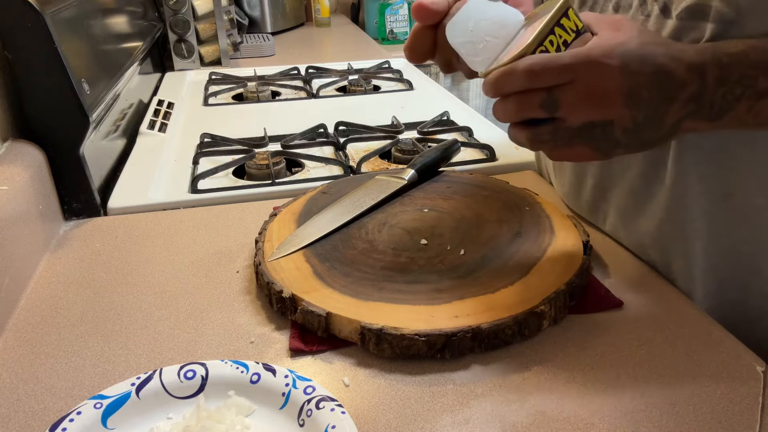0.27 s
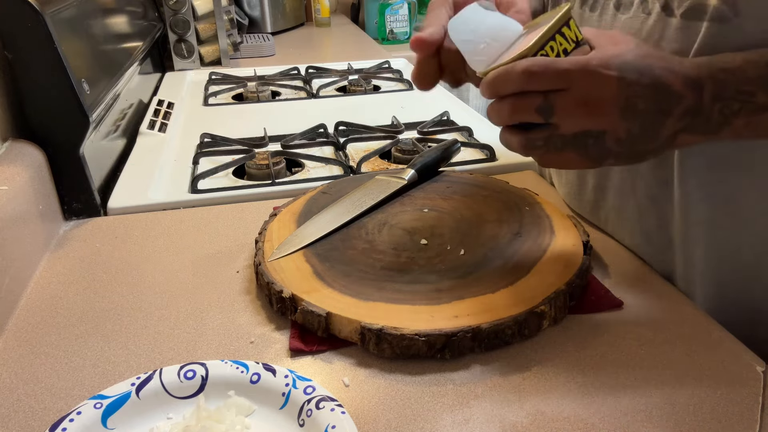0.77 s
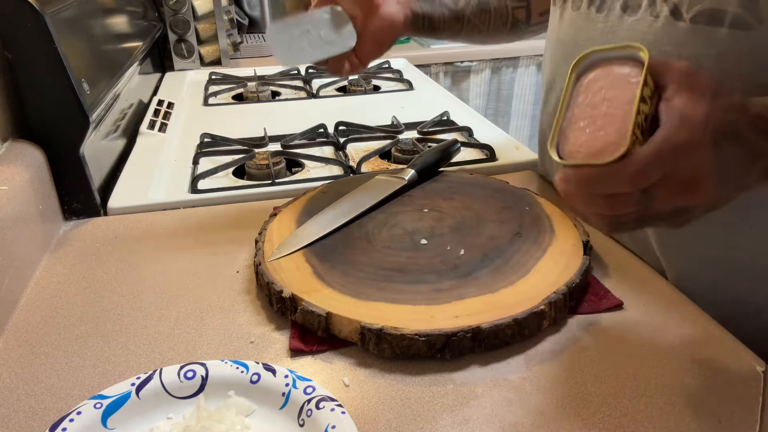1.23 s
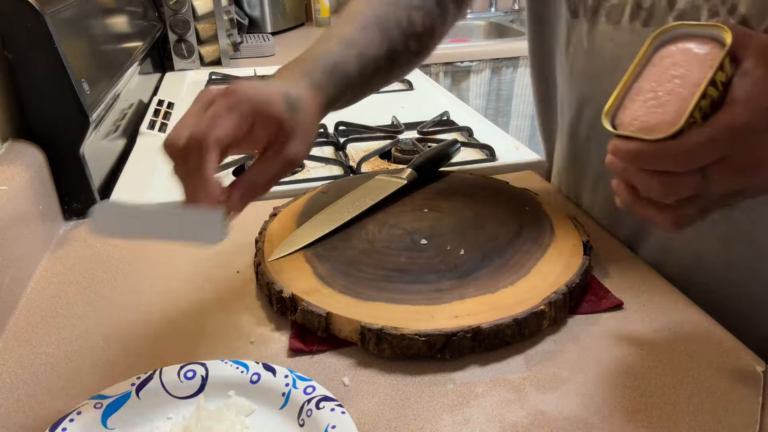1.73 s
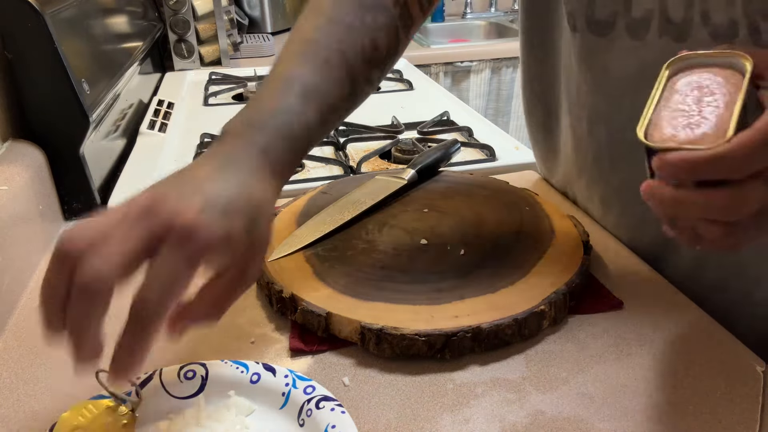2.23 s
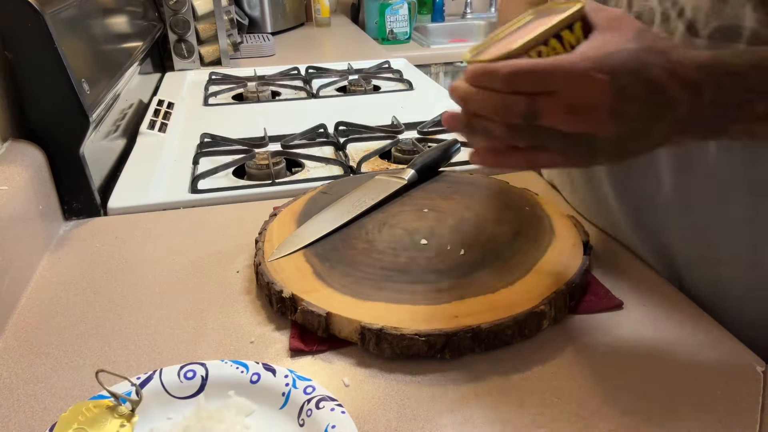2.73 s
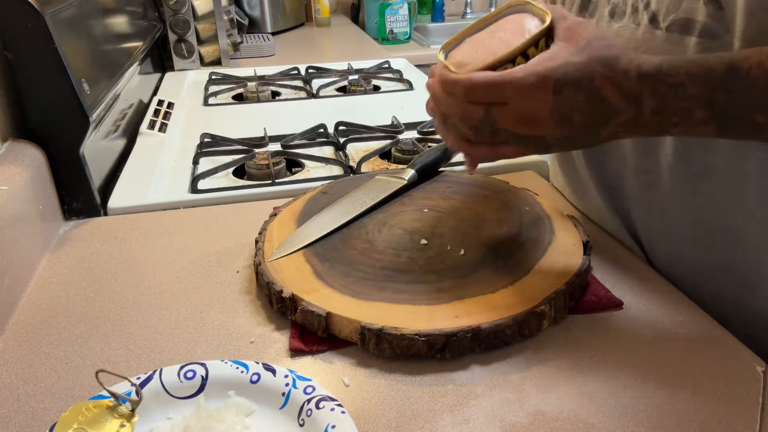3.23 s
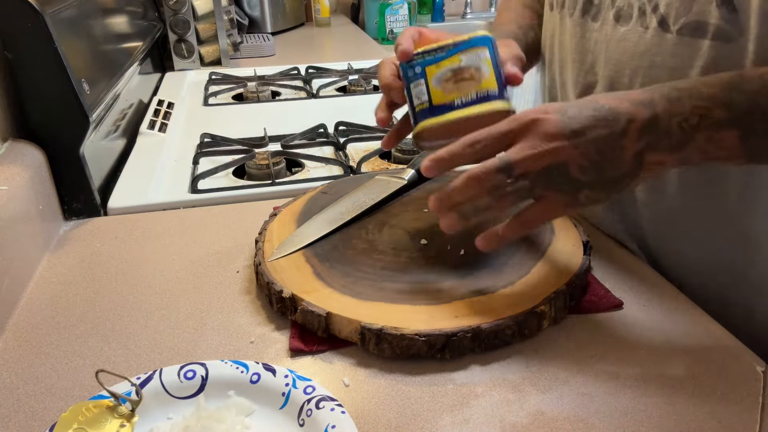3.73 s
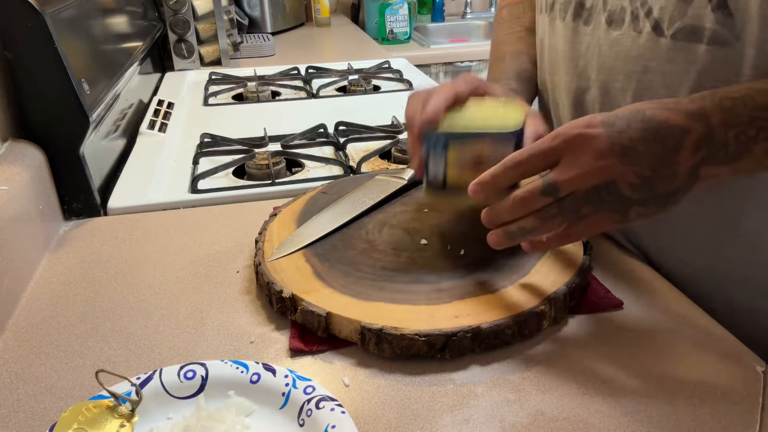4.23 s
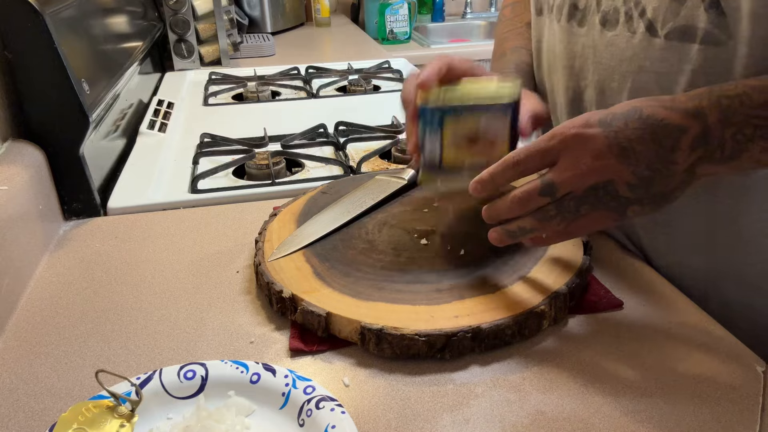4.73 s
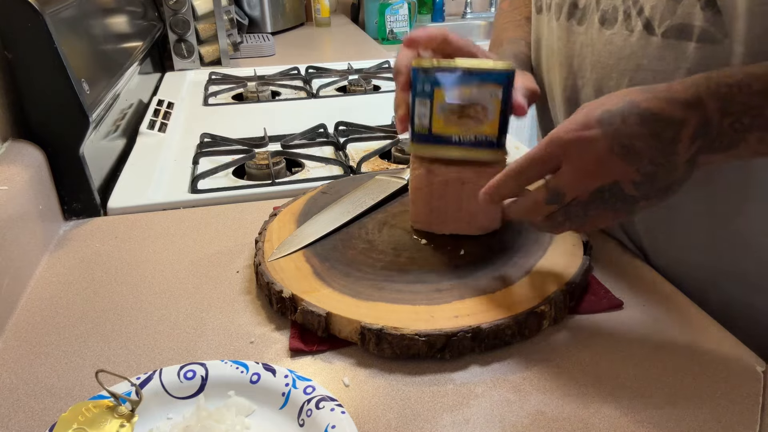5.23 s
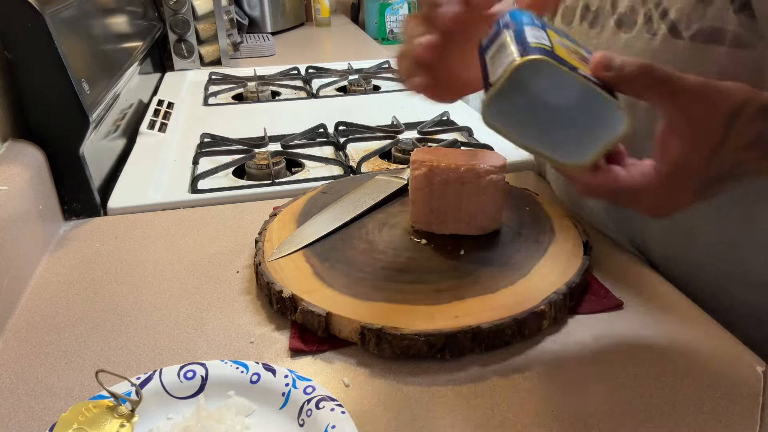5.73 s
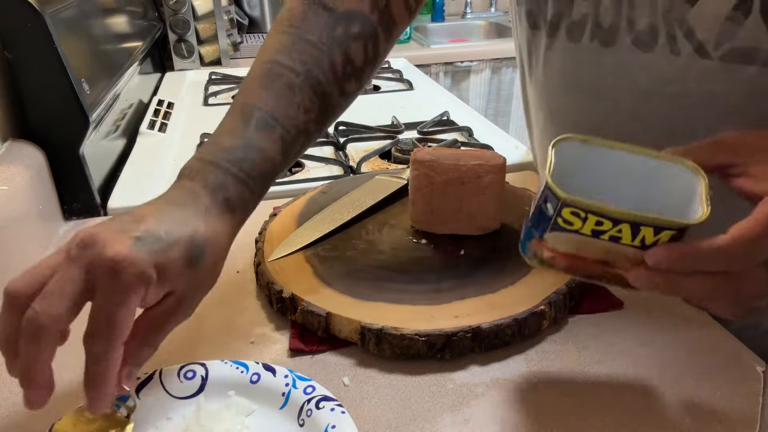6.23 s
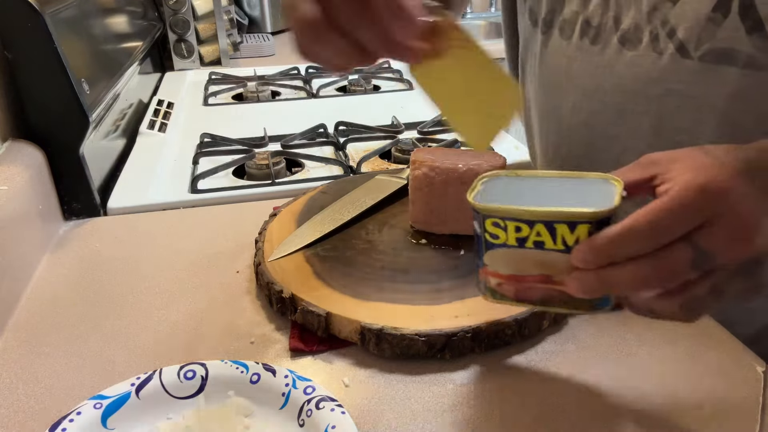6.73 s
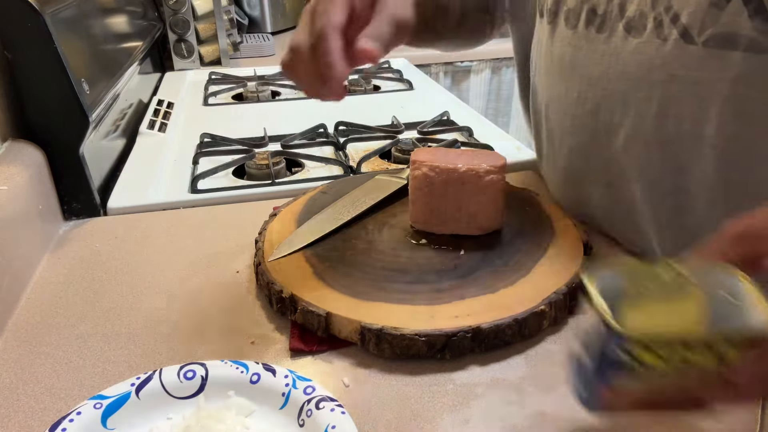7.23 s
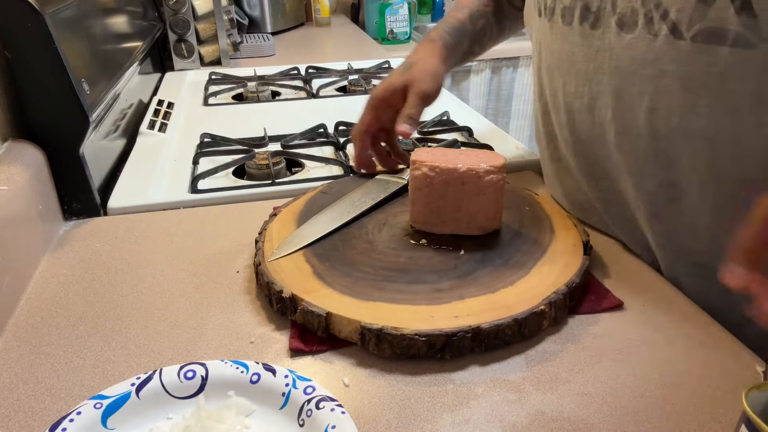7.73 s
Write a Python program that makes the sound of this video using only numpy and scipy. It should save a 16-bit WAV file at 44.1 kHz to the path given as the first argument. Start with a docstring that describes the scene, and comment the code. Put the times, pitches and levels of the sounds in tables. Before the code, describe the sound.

A microwave hums while a can lid snaps off, wet meat thuds onto a wooden board, and the empty can clinks.

```python
"""Emptying a can beside the microwave.

Home kitchen, close to a two-port microphone; a microwave oven's transformer hums and its fan blows.
A tin lid is torn off in snaps and laid down. The can is squeezed until its wall pops, and shaken
until the wet block sucks free and thuds on a wooden board. The lid is dropped into the empty can
and the can is set aside. Each blow is a crack of noise plus ringing modes, answered by the room."""
import sys
import numpy as np
from scipy import signal
from scipy.fft import rfft, irfft
from scipy.io import wavfile

SR = 44100
rng = np.random.default_rng(int(sys.argv[2]) if len(sys.argv) > 2 else 0)


def int16_out(signal):
    """Quantize to a 16-bit WAV file."""
    q = np.round(np.clip(np.atleast_2d(signal).T, -1, 1) * 32767)
    wavfile.write(sys.argv[1], SR, q.astype(np.int16))


N = 352610

# modes of the wet gap between block and can: f/Hz, level/dB, t60/s
WET_GAP_MODES = [(690, 3, 0.03), (866, -4.5, 0.028), (1240, 2.5, 0.054), (1560, 2.5, 0.031),
                 (2100, 2.5, 0.02), (2960, -6, 0.021), (4700, -6.5, 0.0067)]


def tin_lid():
    """The lid tears off in a run of snaps, then taps and rings lower as it is laid down."""
    # blows: t/s, level/dB, crack f/Hz, ring level/dB
    snaps = [(.0648, -20.5, 7800, 6.5), (.0922, -21.5, 11100, 5.5), (.1042, -25, 11600, 3.5),
             (.638, -34.5, 8830, -5.5), (.667, -21, 7990, -12), (.6814, -8.5, 10000, -13),
             (.7472, -6.5, 8520, -11), (.7976, -23.5, 10000, -9.5), (.861, -24.5, 5500, -10.5),
             (.8685, 1.5, 6440, 0), (.8744, 3, 5150, 0), (.8874, -4, 3540, -6)]
    taps = [(2.1075, -18.5, 5700, -3), (2.119, -20, 2550, 5), (2.128, -23, 2530, -6.5)]
    # modes of the lid while tearing and lying flat: f/Hz, level/dB, t60/s
    torn_modes = [(625, -12, 0.045), (1265, -17.5, 0.037), (3200, -12, .03), (4600, -14, 0.04),
                  (6540, -8.5, 0.022), (9160, -5.5, 0.027), (10140, -8, 0.035), (12320, 0.5, 0.013)]
    flat_modes = [(1044, -8, 0.029), (1596, -8, 0.057), (1946, -0.5, 0.038), (2290, 0.5, 0.035),
                  (4560, -16, 0.024)]
    return (blows(snaps, torn_modes, octaves=1.2, cycles=370, tick_db=6, rise_s=0.0014,
                  spread_db=1, pan_db=0.8, room_db=-9)
            + blows(taps, flat_modes, octaves=0.73, cycles=130, tick_db=-11, rise_s=0.0015,
                    spread_db=7, pan_db=2.8, room_db=-17))


def full_can():
    """The squeezed wall strains and pops; then a finger taps the side of the can."""
    # blows: t/s, level/dB, crack f/Hz, ring level/dB
    creaks = [(2.818, -17.5, 1570, -10)]
    pops = [(2.846, -7, 2150, 2.3), (2.861, -7.5, 2320, -1.5)]
    finger_taps = [(3.418, -26.5, 900, 12.3)]
    # modes of the full can and of its hollow note when tapped: f/Hz, level/dB, t60/s
    can_modes = [(630, -1, 0.047), (841, -1.5, 0.047), (1123, 4.5, 0.02), (1360, 0, 0.03), (1624, 5, 0.06),
                 (2050, -12, 0.062), (3250, -11, 0.02), (4430, -14, .02)]
    hollow_modes = [(452.5, 13, 0.056), (598, 5.5, 0.058), (712, -2.5, 0.039), (1080, -6, 0.033),
                    (1196, -6, 0.063)]
    return (blows(creaks, can_modes, octaves=0.37, cycles=250, tick_db=-30, rise_s=0.013,
                  spread_db=5, pan_db=1.5, room_db=-5)
            + blows(pops, can_modes, octaves=1.16, cycles=200, tick_db=3, rise_s=0.0012,
                    spread_db=1.1, pan_db=1, room_db=-2.5)
            + blows(finger_taps, hollow_modes, octaves=1, cycles=13, tick_db=-9, rise_s=0.0049,
                    spread_db=0, pan_db=3.5, room_db=-14))


def wet_block():
    """The block comes loose with wet smacks and a pop as air breaks in behind it."""
    # blows: t/s, level/dB, crack f/Hz, ring level/dB
    smacks = [(4.8224, -36.5, 8890, -7), (4.853, -24.5, 6000, -1), (4.9123, -23, 8000, -6),
              (4.922, -31, 3000, 1), (4.935, -34, 8300, -8), (4.9666, -14.5, 8200, -15),
              (4.976, -34, 3030, 0)]
    suction = [(4.851, -17, 1330, -22)]
    return (blows(smacks, WET_GAP_MODES, octaves=1.3, cycles=315, tick_db=1.5, rise_s=0.0022,
                  spread_db=4, pan_db=1.6, room_db=-10.5)
            + blows(suction, WET_GAP_MODES, octaves=0.15, cycles=40, tick_db=-30, rise_s=0.0079,
                    spread_db=1, pan_db=0, room_db=4))


def board_thud(at_s=5.205, hz=70.6, level_db=-7.5, t60_s=0.084, rise_s=0.011):
    """The block lands on the board: a soft low push that swells for a cycle and dies."""
    t = np.maximum(np.arange(N) / SR - at_s, 0)
    return from_db(level_db - 60 * t / t60_s) * (1 - np.exp(-t / rise_s)) * np.sin(2 * np.pi * hz * t)


def empty_can():
    """The lid drops into the can, then chatters loose inside as the can is set down."""
    # blows: t/s, level/dB, crack f/Hz, ring level/dB
    knocks = [(6.989, -8, 3770, 1), (7.012, -25.5, 3470, 0), (7.044, -6, 5640, -3.2)]
    bumps = [(7.453, -24, 2350, 4), (7.481, -16, 4200, 3), (7.497, -16.5, 3780, 1),
             (7.512, -22.5, 2580, 2.5), (7.524, -25.5, 2500, 4)]
    # modes of the empty can and of the can at rest: f/Hz, level/dB, t60/s
    empty_modes = [(774, 1.5, 0.16), (906, 2, 0.05), (1003, -4, 0.071), (1256, -13.5, 0.14),
                   (1500, -5, 0.052), (2400, -11.5, 0.071), (2850, 2, 0.026), (3500, -5, 0.033),
                   (5300, -23, 0.052), (6700, -19, 0.031)]
    resting_modes = [(523, -6, 0.065), (630, -2, 0.055), (777, -5, 0.057), (820, -3.5, 0.091),
                     (871, 1, 0.099), (964, -7, 0.12), (1002, -2, 0.11), (1433, -9, 0.093),
                     (2160, -13, 0.033), (2680, -13, 0.081), (3007, -4.5, 0.038), (4100, -8.5, 0.076),
                     (5500, -24, 0.025)]
    chatter = scattered(7.46, 7.55, level_db=-30, crack_hz=3000, ring_db=0, count=8)
    return (blows(knocks, empty_modes, octaves=1.12, cycles=204, tick_db=-1, rise_s=0.0053,
                  spread_db=3, pan_db=0.3, room_db=-9)
            + blows(bumps + chatter, resting_modes, octaves=1, cycles=176, tick_db=-21, rise_s=0.0028,
                    spread_db=6, pan_db=0, room_db=-13))


def finger_ticks(crack_hz=9000, ring_db=-17):
    """Faint bright ticks from fingers and can, some at chance times."""
    # timed ticks: t/s, level/dB
    touches = [(0.4396, -49), (1.6606, -30.5), (1.806, -36.5), (3.3004, -34.5), (3.36, -32), (3.6194, -50),
               (4.5494, -44), (4.686, -41), (5.1075, -41), (5.1687, -39), (5.2026, -40), (5.3894, -49),
               (5.54, -46), (6.712, -40)]
    ticks = [(s, level_db, crack_hz, ring_db) for s, level_db in touches]
    ticks += scattered(0.2, 7.7, level_db=-51.5, crack_hz=crack_hz, ring_db=ring_db, count=10)
    return blows(ticks, WET_GAP_MODES, octaves=0.99, cycles=440, tick_db=-9, rise_s=0.004,
                 spread_db=3, pan_db=0.5, room_db=-3.5)


def blows(events, modes, octaves, cycles, tick_db, rise_s, spread_db, pan_db, room_db):
    """Each blow is a tick, a noise crack and freshly struck modes; returns near sound and room feed."""
    tick_t60_s, detune = 0.0092, 0.006  # every blow bends the pitches a little
    rattle_hz, rattle_depth, rattle_full_hz = 300, 0.82, 2480  # loose contact shakes each mode
    near, t = np.zeros((2, N)), np.arange(SR // 4) / SR
    hz, mode_db, t60 = np.transpose(modes)[:, :, None]
    rattle_filter = signal.butter(3, rattle_hz, fs=SR, output="sos")
    shake_depth = rattle_depth * np.minimum(hz / rattle_full_hz, 1)  # lower modes shake less
    attack = 1 - np.exp(-(t / rise_s) ** 2)
    tick_decay = from_db(tick_db - 60 * t / tick_t60_s)
    for s, level_db, crack_hz, ring_db in events:
        edges = np.clip(crack_hz * 2.0 ** (octaves * np.array([-1, 1])), 100, .45 * SR)
        band = signal.butter(2, edges, "band", fs=SR, output="sos")
        noise = rms_one(signal.sosfilt(band, rng.standard_normal(len(t))))
        crack_decay = from_db(-60 * t * crack_hz / cycles)
        crack = noise * (crack_decay + tick_decay)
        strength, bend = rng.standard_normal((2, *hz.shape))
        shake = rms_one(signal.sosfilt(rattle_filter, rng.standard_normal((len(hz), len(t)))))
        mode_decay = from_db(mode_db + spread_db * strength - 60 * t / t60)
        sines = np.sin(2 * np.pi * (hz * (1 + detune * bend) * t + rng.random(hz.shape)))
        ring = np.sum(mode_decay * (1 + shake_depth * shake) * sines, axis=0)
        sound = from_db(level_db) * attack * (crack + from_db(ring_db) * ring) / 2
        at = round(s * SR)
        near[:, at:at + len(t)] += sides(pan_db) * sound[:N - at]
    return np.array([near, from_db(room_db) * near])


def scattered(from_s, to_s, level_db, crack_hz, ring_db, count):
    """Rows for blows at chance times, of uneven strength and brightness."""
    return [(from_s + (to_s - from_s) * when, level_db - 6 * weak,
             crack_hz * (0.45 + 0.84 * bright), ring_db)
            for when, weak, bright in rng.random((count, 3))]


def microwave():
    """Transformer and fan together, their level shifting slowly."""
    # oven level: t/s, level/dB
    levels = [(0, -26.5), (1.6, -27.5), (2.8, -27), (3.1, -29), (6.3, -29.5), (8.0, -28)]
    return from_db(over_time(levels)) * (transformer() + fan())


def transformer(mains_hz=59.96):
    """Nearly pure multiples of the mains, each wavering a little in level."""
    # hum partials: multiple of mains, level/dB, left-right/dB, waver/dB
    partials = [(1, -23, 4, 4), (2, 2, 2, 0), (3, -23, -3.5, 1.5), (4, -18.5, -1, 0.3),
                (5, -30.5, -10, 0.5), (6, -28.5, -13.5, 5.5), (10, -33.5, 7.5, 4.5)]
    t = np.arange(N) / SR
    hum = 0
    for multiple, level_db, pan_db, waver_db in partials:
        sine = np.sqrt(2) * np.sin(2 * np.pi * (multiple * mains_hz * t + rng.random()))
        hum = hum + sides(pan_db) * from_db(level_db + waver_db * drift(10)) * sine
    return hum


def fan():
    """Smooth air noise plus narrow bands where the cabinet sings; each pitch leans to its own side."""
    # air spectrum, in phase and out of phase at the ports: f/Hz, relative level/dB
    air_mid = [(22, -61.5), (33, -29), (45, -22), (88, -20), (123, -8), (217, -22.5), (383, -26.5),
               (482, -43), (592, -33), (786, -41), (2840, -42.5), (6500, -60.5), (10500, -62.5),
               (14000, -91.5)]
    air_side = [(22, -57), (45, -31), (88, -5.5), (123, -3.5), (172, -13), (241, -7), (296, -14),
                (354, -11.5), (650, -12.5), (1160, -22.5), (1980, -25.5), (8590, -47.5), (10500, -77.5),
                (14000, -77)]
    # fan and cabinet resonances: f/Hz, width/Hz, level/dB, side share/dB
    cabinet = [(175.97, 5.04, -9.5, -15.5), (393.6, 20, -24.5, -1), (328.5, 40, -25.5, -4),
               (705, 45, -33.5, 5.5), (921.3, 52, -35, 8.5), (1698, 50, -35, 1.5), (2068, 430, -37, 13)]
    # lean of the fan noise: f/Hz, left-right/dB
    balance = [(60, -1.5), (110, 2.5), (200, 0), (380, -4), (700, -0.5), (1290, 3.5), (2380, -4), (4400, 2),
               (8120, -1.5), (15000, 1.5)]
    mid, side = from_db(-8) * coloured(air_mid), from_db(-12.5) * coloured(air_side)
    for hz, width_hz, level_db, side_db in cabinet:
        noise = rng.standard_normal((2, N))
        mid_band, side_band = resonance(resonance(noise, hz, width_hz), hz, width_hz)
        mid = mid + from_db(level_db) * rms_one(mid_band)
        side = side + from_db(level_db + side_db) * rms_one(side_band)
    gusts = from_db(.5 * drift(6))
    return gusts * irfft(rfft([mid + side, mid - side]) * sides(over_pitch(balance)), N)


def kitchen(x, t60_s=0.26, build_s=0.0028, band_hz=(895, 8700)):
    """Dense echoes build up, other ones at each port; the walls swallow bass and treble."""
    t = np.arange(SR // 2) / SR
    envelope = from_db(-60 * t / t60_s) * (1 - np.exp(-(t / build_s) ** 2))
    echoes = rng.standard_normal((2, len(t))) * envelope
    echoes = signal.lfilter(*signal.butter(1, band_hz, "band", fs=SR), echoes)
    return signal.fftconvolve(x, echoes / np.sqrt(np.sum(echoes ** 2) / 2), axes=1)[:, :N]


def rustle():
    """A faint, patchy treble hiss, unrelated at the two ports."""
    # hiss level: t/s, level/dB
    levels = [(0, -75), (3.001, -78.5), (5.9, -74), (7.451, -89), (7.649, -67.5), (8.0, -65)]
    treble = signal.butter(4, [7500, 12800], "band", fs=SR, output="sos")
    hiss = rms_one(signal.sosfilt(treble, rng.standard_normal((2, N))))
    return from_db(over_time(levels) + 3 * drift(11)) * hiss


def microphone_ports(x):
    """The two ports hear a close sound with a phase gap that depends on pitch."""
    # phase gap: f/Hz, left lead/rad
    phase_gap = [(0, -6.5), (260, 3.13), (1550, 7.5), (1890, 7.5), (3100, 5), (4130, 4), (4650, 8),
                 (6720, 3.5), (7150, 1), (7580, 2), (9730, 0.07), (12800, 1.5), (14000, -1.5),
                 (16000, -6.5)]
    lead = np.interp(np.fft.rfftfreq(N, 1 / SR), *np.transpose(phase_gap))
    return irfft(rfft(x) * np.exp(.5j * lead * np.array([[1], [-1]])), N)


def level_dips(fall_s=0.0067, hold_s=0.1, rise_s=0.13):
    """After the hardest lid snap and can pop the level falls fast, creeps up a little, then recovers."""
    # dips: t/s, depth/dB
    dips = [(0.869, 12), (2.847, 13.5)]
    t, corners = np.arange(N) / SR, np.cumsum([0, fall_s, hold_s, rise_s])
    return from_db(-sum(depth_db * np.interp(t - s, corners, [0, 1, 0.93, 0]) for s, depth_db in dips))


def from_db(db):
    """Decibels to gain."""
    return 10 ** (np.asarray(db) / 20)


def rms_one(x):
    """Scale to rms 1."""
    return x / np.sqrt(np.mean(x ** 2) + 1e-20)


def sides(pan_db):
    """Left and right gains for a level gap."""
    return from_db(np.array([[.5], [-.5]]) * pan_db)


def over_time(points):
    """Join (t/s, level/dB) points, one value a sample."""
    return np.interp(np.arange(N) / SR, *np.transpose(points))


def over_pitch(points):
    """Join (f/Hz, level/dB) points along log frequency, one value a spectrum bin."""
    hz, db = np.transpose(points)
    return np.interp(np.log(np.fft.rfftfreq(N, 1 / SR) + 1), np.log(hz), db)


def coloured(points):
    """Noise with the given spectrum, rms 1."""
    return rms_one(irfft(rfft(rng.standard_normal(N)) * from_db(over_pitch(points)), N))


def drift(rate_hz):
    """Slow random wander, rms 1."""
    step, settle = 40, 2000  # samples a step; steps for the filter to settle
    pole = np.exp(-2 * np.pi * rate_hz * step / SR)
    noise = rng.standard_normal(N // step + settle + 2)
    slow = signal.lfilter([1], [1, -2 * pole, pole * pole], noise)[settle:]
    return np.interp(np.arange(N) / step, np.arange(len(slow)), rms_one(slow))


def resonance(x, hz, width_hz):
    """One resonance with gain 1 at its peak."""
    r = np.exp(-np.pi * width_hz / SR)
    gain = (1 - r * r) / 2
    return signal.lfilter([gain, 0, -gain], [1, -2 * r * np.cos(2 * np.pi * hz / SR), r * r], x)


def scene():
    """Close handling and the oven dip in level together; thud and rustle lie on top."""
    oven = microwave()
    near, to_walls = tin_lid() + full_can() + wet_block() + empty_can() + finger_ticks()
    handling = microphone_ports(near) + kitchen(to_walls)
    return level_dips() * (oven + handling) + sides(pan_db=2) * board_thud() + rustle()


def record(dry):
    """Rumble and top treble roll off, peaks are rounded, then the top is cut."""
    band_hz, cutoff_hz = (38, 13500), 16450
    trimmed = signal.sosfilt(signal.butter(4, band_hz, "band", fs=SR, output="sos"), dry)
    rounded = 0.91 * np.tanh(trimmed / 0.78)
    return signal.sosfilt(signal.cheby2(12, 70, cutoff_hz, fs=SR, output="sos"), rounded)


dry = scene()
out = record(dry)
int16_out(out)
```